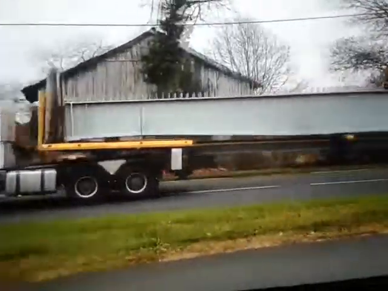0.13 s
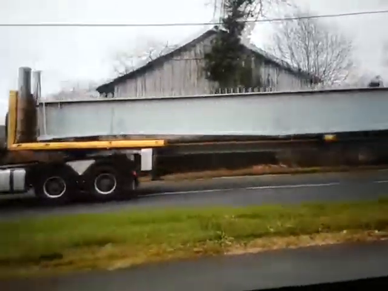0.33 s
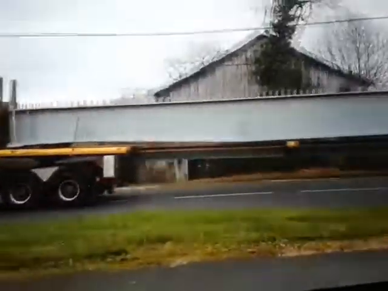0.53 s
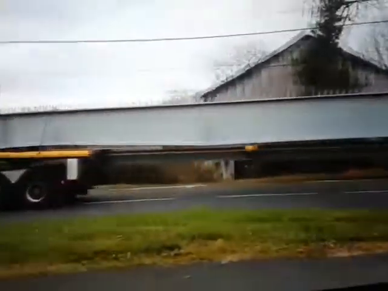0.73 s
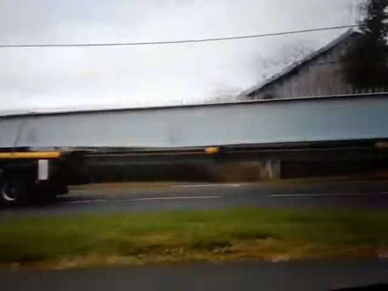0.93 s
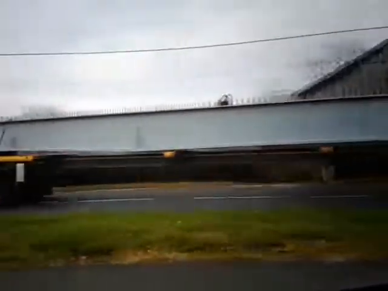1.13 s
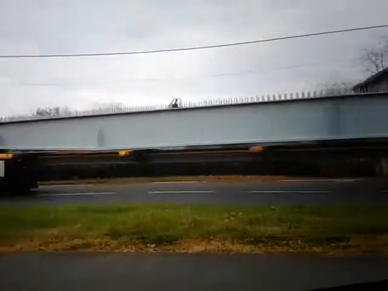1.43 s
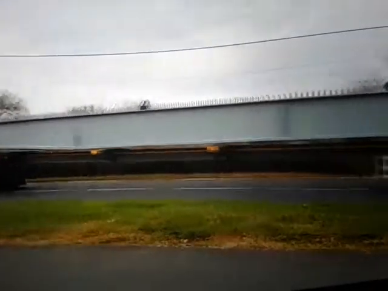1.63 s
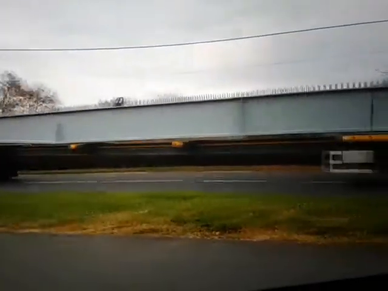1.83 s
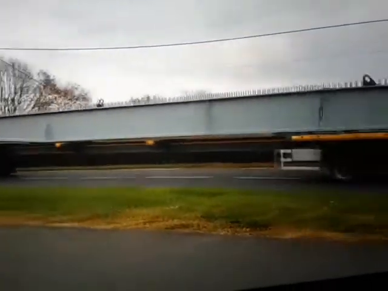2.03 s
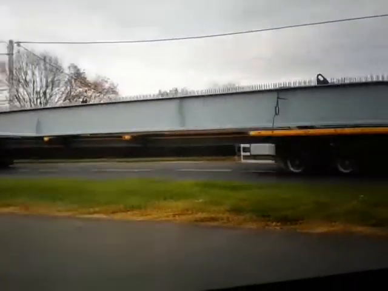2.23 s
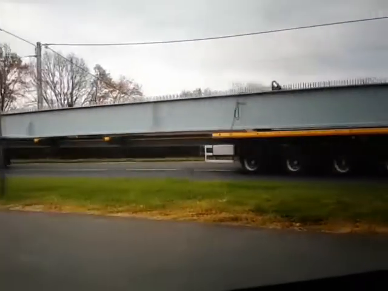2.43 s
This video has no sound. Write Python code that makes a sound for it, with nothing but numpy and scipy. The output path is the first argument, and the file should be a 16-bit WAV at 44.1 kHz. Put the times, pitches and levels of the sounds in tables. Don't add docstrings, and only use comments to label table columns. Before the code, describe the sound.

A heavy lorry passes on a wet road, heard through car glass: boomy tyre roar, fluttering exhaust drone and throbbing engine, a tiny click midway, then a clearer low hum as the roar slowly eases.

```python
import sys
import numpy as np
from scipy import signal
from scipy.fft import rfft, irfft, next_fast_len
from scipy.io import wavfile
from scipy.ndimage import uniform_filter1d, map_coordinates

SR = 44100
rng = np.random.default_rng(int(sys.argv[2]) if len(sys.argv) > 2 else 0)


def natural_amplitude(level_db):
    exponent = np.asarray(level_db, float) / 20
    return 10 ** exponent


def transcribe(signal):
    frames = np.atleast_2d(signal).T
    limited = np.clip(frames, -1, 1)
    pcm = np.round(limited * 32767).astype(np.int16)
    wavfile.write(sys.argv[1], SR, pcm)


N = 113337
T = np.arange(N) / SR

# (time [s], frequency [Hz])
DRONE_PITCH = [
    (0, 283.6),
    (.6, 281.1),
    (1.0, 278.1),
    (1.35, 276.6),
    (2.57, 274.8),
]
# (start [s], length [s], level [dB])
SURGES = [(0.017, .03, -55), (0.094, 0.03, -56), (.14, 0.028, -45), (0.182, 0.022, -39.5), (.25, .03, -54),
          (0.328, 0.065, -45.5), (0.396, 0.068, -48), (0.468, 0.045, -44.5), (0.515, .1, -51),
          (0.801, 0.038, -48), (0.888, .11, -47), (1.043, .05, -50), (1.118, 0.071, -54),
          (1.215, 0.028, -44.5), (1.272, .06, -50), (1.328, .14, -44), (1.471, .11, -40.5),
          (1.581, 0.051, -43), (1.639, .06, -41), (1.712, 0.07, -39.5), (1.81, .11, -44.5),
          (1.925, 0.037, -45), (1.995, 0.059, -42.5), (2.07, 0.062, -41), (2.137, 0.086, -39),
          (2.224, 0.16, -41.5), (2.385, .09, -45), (2.485, 0.033, -41.5)]
# (time [s], frequency [Hz])
GEAR_PITCH = [
    (0, 403),
    (.6, 408),
    (1.3, 405),
    (1.8, 405.3),
    (2.1, 399.7),
    (2.57, 395),
]
# (time [s], level [dB])
GEAR_LEVEL = [(0, -64.5), (.15, -56.5), (.27, -64), (.5, -70.5), (.57, -53), (.67, -62), (.77, -58),
              (.95, -57.5), (1.08, -62), (1.14, -54), (1.53, -55.5), (1.62, -66), (1.72, -65),
              (1.84, -49.5), (2.02, -41.5), (2.1, -47), (2.36, -52), (2.57, -48)]
# (multiple of the cycle rate [1], level [dB])
ENGINE_ORDERS = [(15.15, -62), (13.38, -68), (22.5, -64), (28.52, -61.5), (32.79, -58.5), (40.5, -69.5),
                 (56.2, -67), (60.34, -60), (69.8, -58), (85.9, -68.5)]
# (time [s], level [dB])
EFFORT = [
    (0, -4),
    (.25, -1.5),
    (.5, 1),
    (.9, -5),
    (1.1, -7),
    (1.55, -8),
    (2.0, -14.5),
    (2.57, -11),
]
# (frequency [Hz], level [dB])
TREAD_TONES = [(1518, -82), (1567, -78.5), (1626, -77.5), (1820, -81.5), (1890, -83), (1927, -81),
               (2019, -82.5), (2213, -85.5), (2433, -91.5), (2536, -82)]
# (time [s], level [dB])
AXLES = [
    (0, -0.5),
    (.8, 1.5),
    (1.1, 3),
    (1.7, 3.5),
    (1.9, -0.5),
    (2.57, -6.5),
]
# (time [s], level [dB])
PASS_LEVEL = [
    (0.0, -61),
    (1.16, -60.5),
    (1.66, -61),
    (2.3, -63.5),
    (2.57, -64.5),
]
# (frequency [Hz], density [dB per Hz])
SPRAY_SPECTRUM = [(2400, -26), (3000, 0.5), (4500, -4.5), (5600, -12), (7000, -25.5)]
# (frequency [Hz], width [Hz], level [dB])
CABIN_MODES = [(118, 30, -4.5), (144.4, 15, 0), (167.5, 33, -4), (222.7, 25, 1), (281.2, 28, -0.5),
               (331.2, 9.2, -4.5), (395, 26, -4.5), (442, 39, -5.5), (498, 50, -5.5), (575, 61, -4),
               (677, 63, -8.5), (789.5, 50, -10)]
# (frequency [Hz], density [dB per Hz])
TYRE_SPECTRUM = [(350, -35), (600, -1.5), (680, -5), (736, -11), (786, -3), (1100, -7.5), (1950, -12.5),
                 (2530, -15), (2900, -27.5), (3770, -65), (6380, -120)]
# (frequency [Hz], density [dB per Hz])
RUMBLE_SPECTRUM = [(20, -31), (45, -21.5), (65, -9.5), (100, -8), (130, -29.5), (220, -120)]
# (multiple of the buzz frequency [1], level [dB])
BUZZ_LINES = [(29, -101), (33, -104), (41, -100), (45, -98), (46, -106), (47, -109), (48, -104),
              (49, -90.5), (50, -97), (51, -106), (52, -111), (53, -107), (54, -114), (70, -118),
              (74, -114), (86, -114), (87, -116), (90, -113), (91, -116), (94, -113), (95, -104),
              (96, -111), (97, -111), (98, -100), (99, -95), (100, -109), (102, -118), (103, -112)]
# (frequency [Hz], level [dB])
WHINE_LINES = [(7674, -108), (7733.8, -101), (7793.3, -106), (7853, -111), (15497, -109), (15527, -106),
               (15620, -114)]
# (frequency [Hz], density [dB per Hz])
HISS_SPECTRUM = [(2500, -16), (3000, 0.5), (4500, -2.5), (5600, -12.5), (6200, -1.5), (6900, -22.5),
                 (10000, -21.5), (12000, -16), (12450, -7), (12900, -16), (15650, -15.5)]
# (frequency [Hz], side under mid [dB])
PORT_DIFFERENCE = [(60, -20), (150, -37), (280, -44.5), (400, -33), (1000, -18.5), (3000, -14),
                   (6000, -11.5), (8500, -5), (12000, -8), (14500, -4)]

DRONE_ROUGH_EARLY, DRONE_ROUGH_LATE, SETTLE_S = .1, .04, 1.3
SURGE_EDGE_S, LULL_DB = .012, -65
GEAR_ROUGH = .04
CYCLE_HZ, SAG_HZ_PER_S, HUSH_S = 8.15, .11, .18
BEATING = 18
UPPER_DB, LOWER_DB, LOWER_GAINS_DB_PER_S = -50, -54, 2
SPRAY_DB = -23.5
CABIN_DB, CABIN_FADES_DB_PER_S, CABIN_LOW_HZ = -50, 1, 95
TYRE_DB, RUMBLE_DB, HISS_DB = 1.5, -72, -86
ECHO_DB, ECHO_S = -12, .04
BUZZ_HZ = 125.945
SPLICE_S, JUMP_DB, MEND_S = 1.42331, -49, 0.0017
DROPPED_S, SKIP_TURNS = .078, .56
OFFSET, TAPER_S = -.00067, .0012


def unit(x):
    return x / np.sqrt(np.mean(x ** 2) + 1e-20)


def along(points, hz):
    f, v = np.transpose(points)
    return np.interp(np.log(hz + 1), np.log(f + 1), v)


def curves(rows):
    s, *cols = np.transpose(rows)
    return [np.interp(T, s, c) for c in cols]


def wobble(rate):
    knots = rng.standard_normal(int(N * 60 / SR) + 9)
    return map_coordinates(knots, [T * min(rate, 60)])


def filtered(x, response):
    m = next_fast_len(N + 8192)
    return irfft(rfft(x, m) * response(np.fft.rfftfreq(m, 1 / SR)), m)[..., :N]


def rush(response, patchy_db):
    z = signal.stft(rng.standard_normal(N + 512), nperseg=512)[2]
    across_hz = uniform_filter1d(rng.standard_normal(z.shape), size=5, axis=0)
    patches = unit(uniform_filter1d(across_hz, size=14, axis=1))
    noise = signal.istft(z * natural_amplitude(patchy_db * patches), nperseg=512)[1][:N]
    return unit(filtered(noise, response))


def hum(hz, db, rough, rate, skip=0):
    share = np.clip(rough, 0, 1)
    waver = np.sqrt(1 - share) + np.sqrt(share / 2) * (wobble(rate) + 1j * wobble(rate))
    turns = np.cumsum(hz) / SR
    turns = turns - turns[round(SPLICE_S * SR)] + .5 + skip * (T > SPLICE_S)
    return np.sqrt(2) * natural_amplitude(db) * np.real(waver * np.exp(2j * np.pi * turns))


def exhaust_drone():
    unsettled = 1 / (1 + np.exp((T - SETTLE_S) / 0.074))
    rough = DRONE_ROUGH_LATE + (DRONE_ROUGH_EARLY - DRONE_ROUGH_LATE) * unsettled

    def step(s):
        return .5 + .5 * np.tanh((T - s) / SURGE_EDGE_S)

    surges = sum(natural_amplitude(db) * abs(step(s) - step(s + length)) for s, length, db in SURGES)
    size = natural_amplitude(LULL_DB) + surges
    return size * hum(*curves(DRONE_PITCH), 0, rough, 18, SKIP_TURNS)


def gear_hum():
    return hum(*curves(GEAR_PITCH), *curves(GEAR_LEVEL), GEAR_ROUGH, 12)


def engine():
    since = T - HUSH_S
    turns = CYCLE_HZ * since - SAG_HZ_PER_S * since ** 2 / 2
    skipped = CYCLE_HZ * DROPPED_S * (.5 + .5 * np.tanh((T - SPLICE_S) / .006))
    effort_db, = curves(EFFORT)

    def order(n, db, size_db, slip, skip=0):
        size = np.sqrt(2) * natural_amplitude(db + size_db * wobble(7))
        return size * np.sin(2 * np.pi * (n * turns - skip) + slip * wobble(5.5))

    upper = order(BEATING, UPPER_DB + effort_db, .8, .1)
    lower_db = LOWER_DB + effort_db + LOWER_GAINS_DB_PER_S * T
    lower = order(BEATING - 1, lower_db, .8, .06, skipped)
    others = sum(order(n, db + .5 * effort_db, 2.5, 1.1) for n, db in ENGINE_ORDERS)
    return upper - lower + others


def spray():
    level_db = curves(PASS_LEVEL)[0] + SPRAY_DB
    return natural_amplitude(level_db) * rush(lambda f: natural_amplitude(along(SPRAY_SPECTRUM, f)), patchy_db=-0.5)


def tread():
    sing_db, = curves(AXLES)
    return sum(hum(hz * (1 + .003 * wobble(1.6)), db + sing_db + 2.9 * wobble(2.8), 0.75, 30)
               for hz, db in TREAD_TONES)


def cabin_roar():
    def modes(f):
        power = 0
        for centre, width, db in CABIN_MODES:
            resonance = f * width / (centre * centre - f * f + 1j * f * width)
            power = power + abs(natural_amplitude(db) * resonance ** 1.422) ** 2
        return np.sqrt(power) / np.sqrt(1 + (CABIN_LOW_HZ / (f + 1)) ** 8)

    level_db = CABIN_DB - CABIN_FADES_DB_PER_S * T + 0.45 * wobble(8.4)
    return natural_amplitude(level_db) * rush(modes, patchy_db=2.6)


def tyre_roar():
    level_db, = curves(PASS_LEVEL)
    walls = rng.random((9, 2))

    def response(f):
        echoes = 1 + sum(natural_amplitude(ECHO_DB) * (2 * g - 1) * np.exp(-2j * np.pi * f * ECHO_S * (.15 + d))
                         for d, g in walls)
        return natural_amplitude(along(TYRE_SPECTRUM, f)) * echoes

    return natural_amplitude(level_db + TYRE_DB + 0.16 * wobble(9)) * rush(response, patchy_db=1.0)


def rumble():
    return natural_amplitude(RUMBLE_DB) * rush(lambda f: natural_amplitude(along(RUMBLE_SPECTRUM, f)), patchy_db=1.5)


def circuit_whine():
    lines = [(n * BUZZ_HZ, db) for n, db in BUZZ_LINES] + WHINE_LINES
    whine = 0
    for hz, db in lines:
        size = np.sqrt(2) * natural_amplitude(db + 1.6 * wobble(40))
        whine = whine + size * np.sin(2 * np.pi * (hz * T + rng.random()) + .22 * wobble(50))
    return whine


def camera_hiss():
    def response(f):
        return natural_amplitude(along(HISS_SPECTRUM, f)) * (f > 2300) * (f < 15750)

    return natural_amplitude(HISS_DB) * rush(response, patchy_db=-0.2)


def dropped_samples():
    u = T - SPLICE_S
    jump = natural_amplitude(JUMP_DB) / 2 * np.sign(u) * np.exp(-abs(u) / MEND_S)
    return filtered(jump, lambda f: np.clip((16600 - f) / 400, 0, 1))


def scene():
    lorry = exhaust_drone() + gear_hum() + engine() + spray() + tread()
    heard_inside = cabin_roar() + tyre_roar() + rumble()
    camera = circuit_whine() + camera_hiss() + dropped_samples()
    mid = lorry + heard_inside + camera
    hz, _, z = signal.stft(mid, SR, nperseg=1024)
    stray = np.sqrt(np.mean(abs(z) ** 2, axis=1)) * natural_amplitude(along(PORT_DIFFERENCE, hz))
    side = filtered(rng.standard_normal(N), lambda f: np.interp(f, hz, stray)) * np.sqrt(1024 / 3)
    return np.array([mid + side, mid - side])


def band_limit(x):
    return signal.sosfilt(signal.butter(12, 15750, fs=SR, output="sos"), x)


def record(dry):
    closing = np.sin(np.pi / 2 * np.clip((T[-1] - T) / TAPER_S, 0, 1)) ** 2
    return band_limit(dry * closing + OFFSET)


dry = scene()
out = record(dry)
transcribe(out)
```